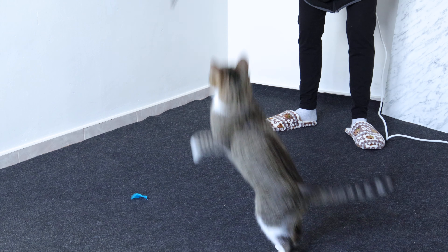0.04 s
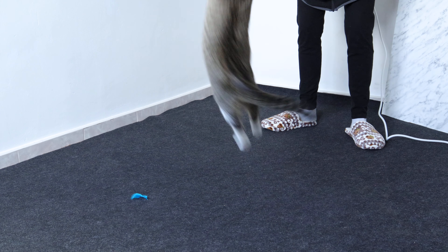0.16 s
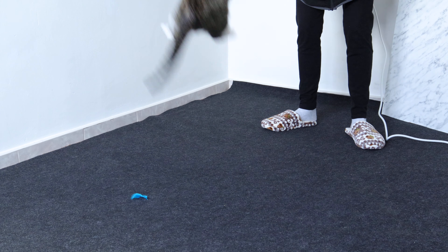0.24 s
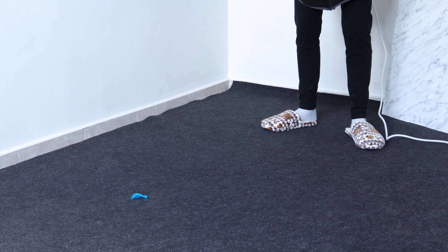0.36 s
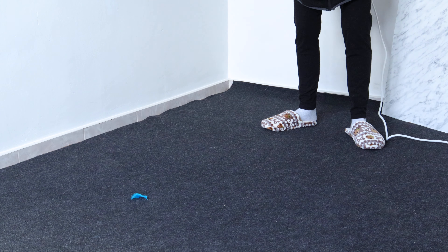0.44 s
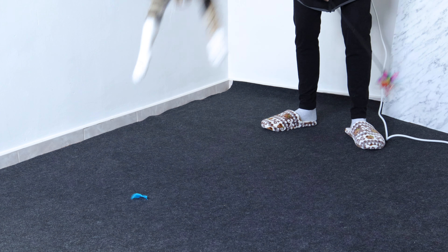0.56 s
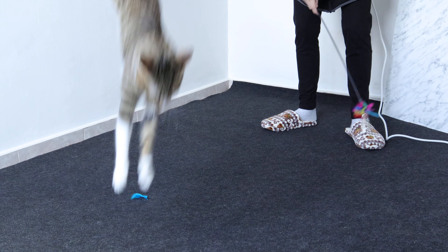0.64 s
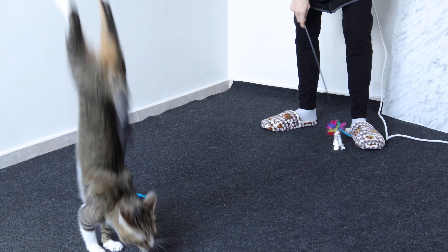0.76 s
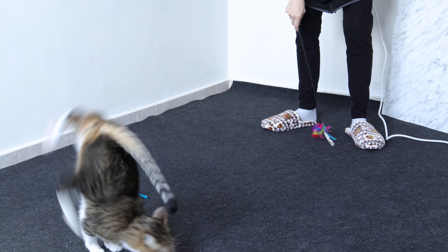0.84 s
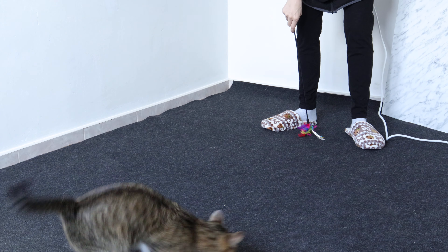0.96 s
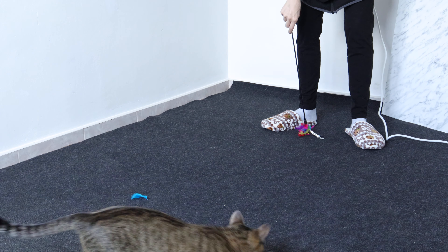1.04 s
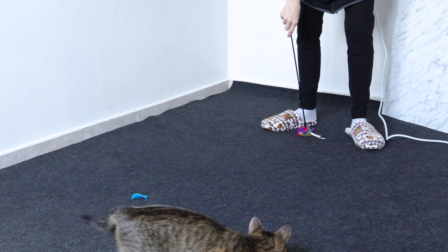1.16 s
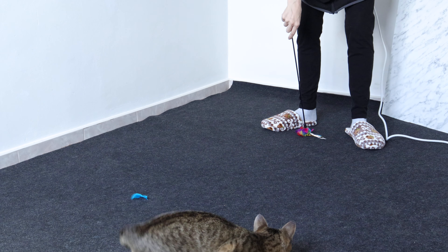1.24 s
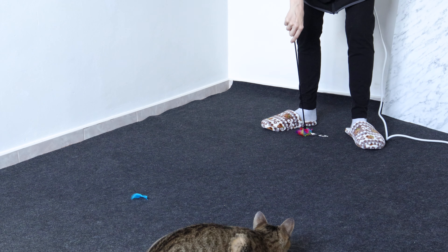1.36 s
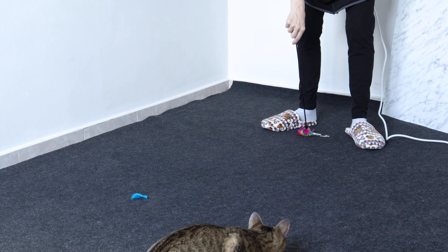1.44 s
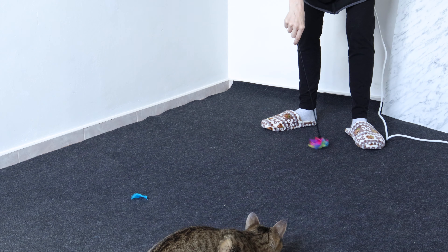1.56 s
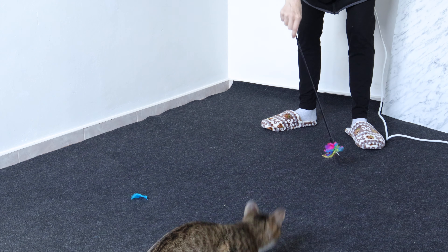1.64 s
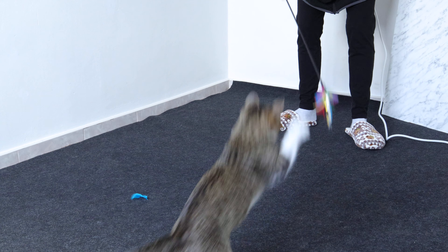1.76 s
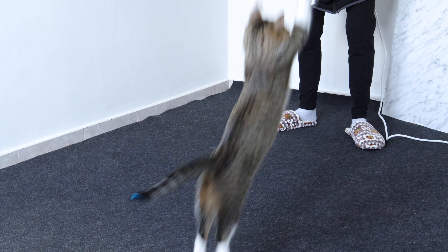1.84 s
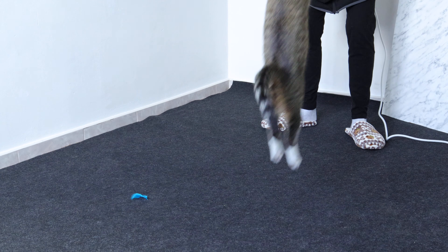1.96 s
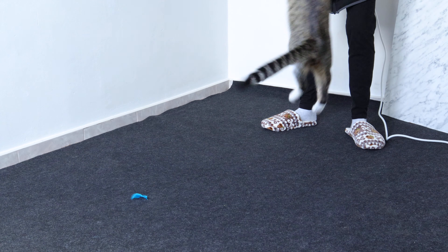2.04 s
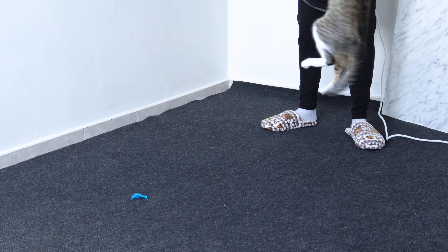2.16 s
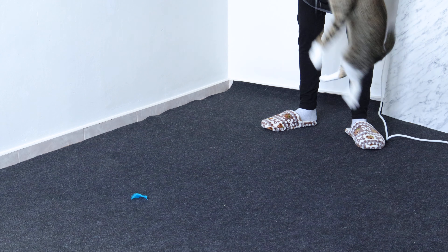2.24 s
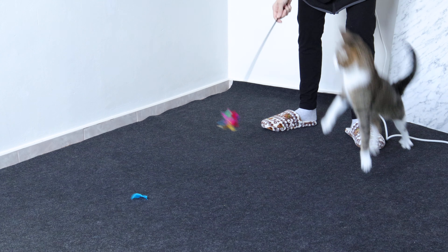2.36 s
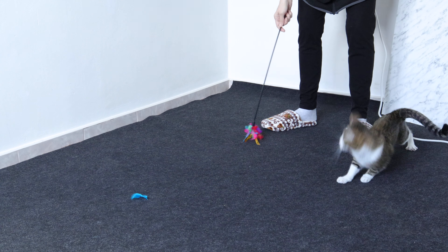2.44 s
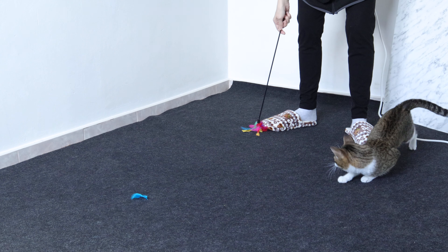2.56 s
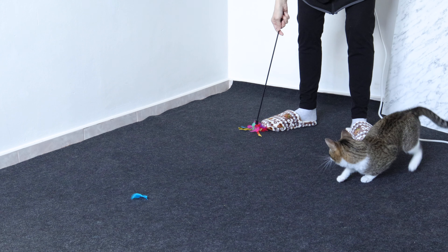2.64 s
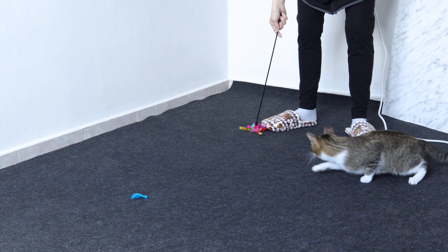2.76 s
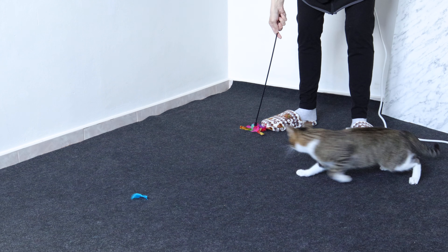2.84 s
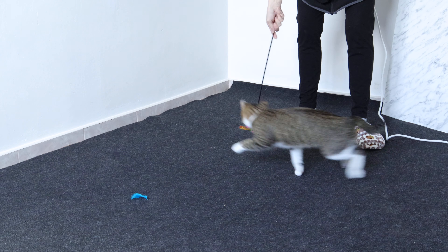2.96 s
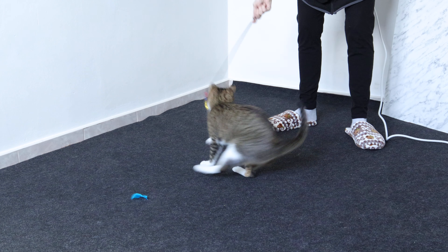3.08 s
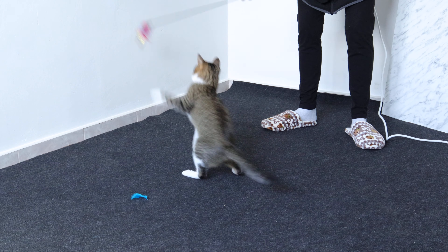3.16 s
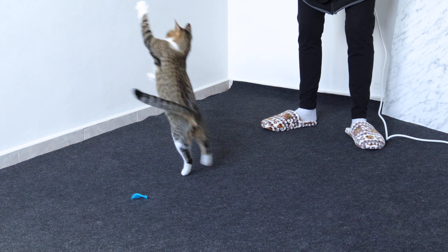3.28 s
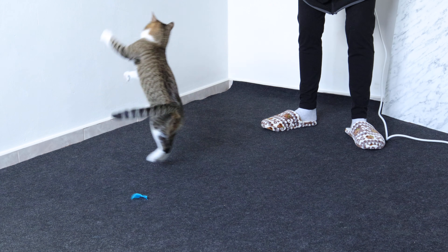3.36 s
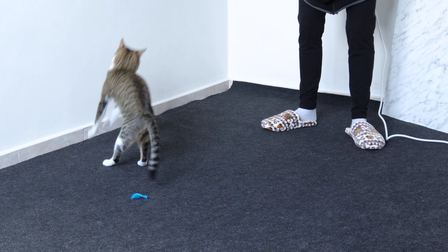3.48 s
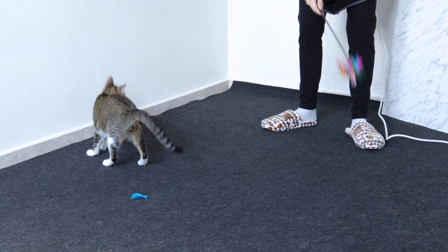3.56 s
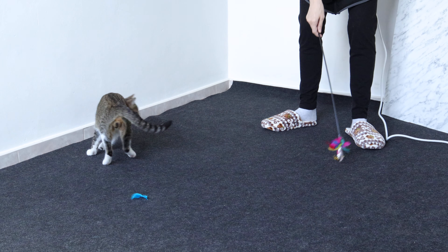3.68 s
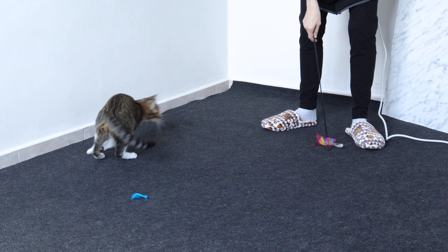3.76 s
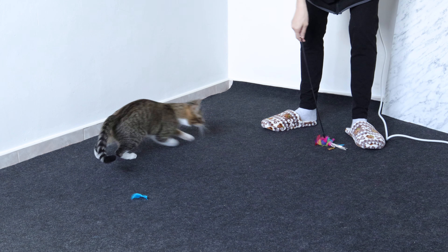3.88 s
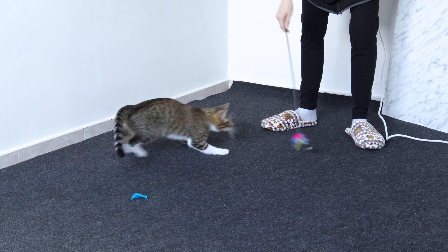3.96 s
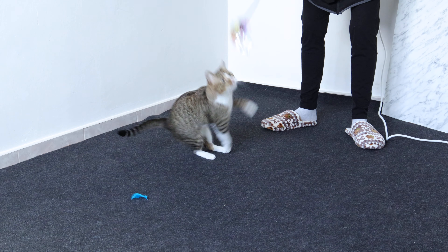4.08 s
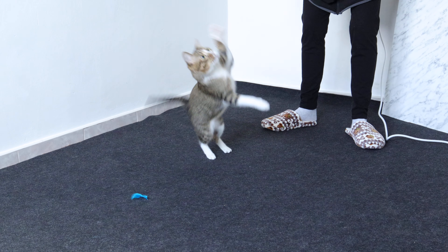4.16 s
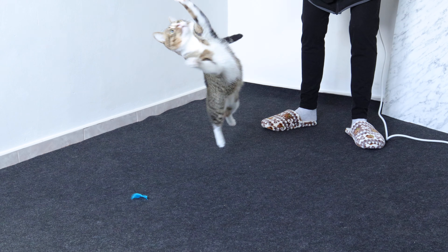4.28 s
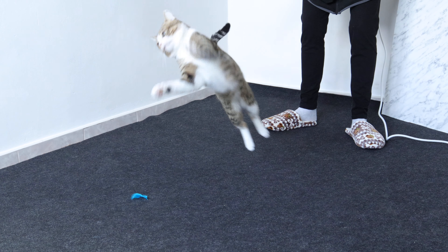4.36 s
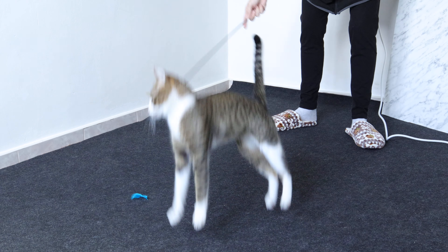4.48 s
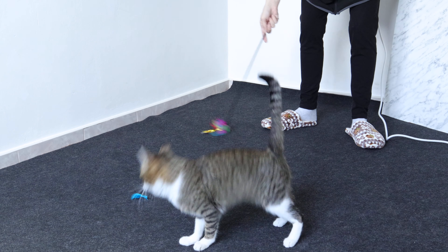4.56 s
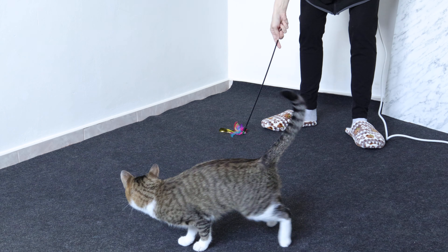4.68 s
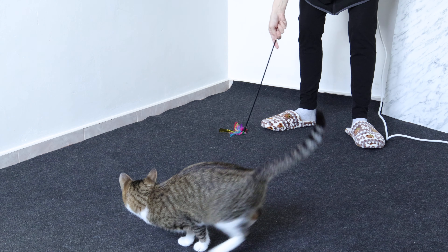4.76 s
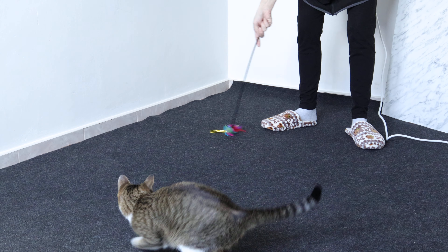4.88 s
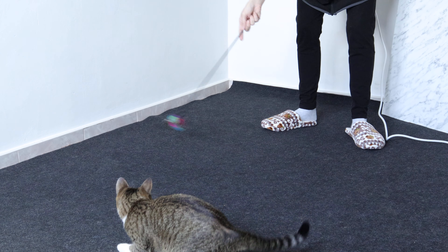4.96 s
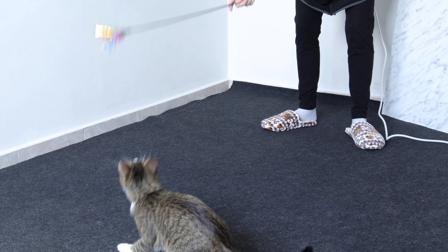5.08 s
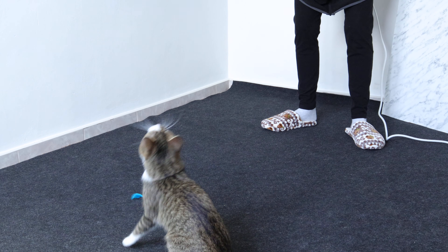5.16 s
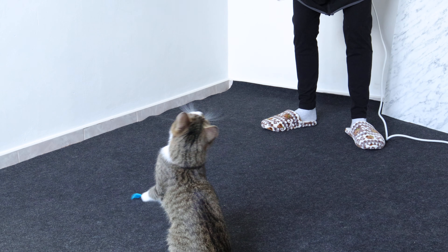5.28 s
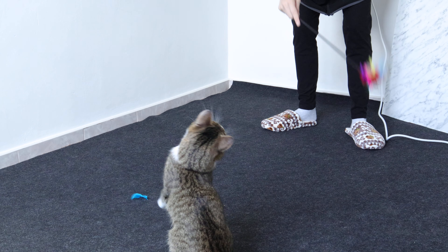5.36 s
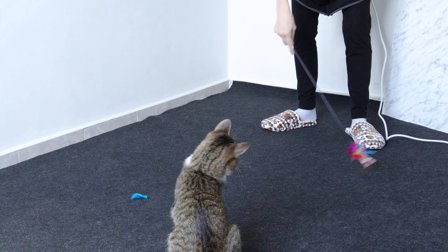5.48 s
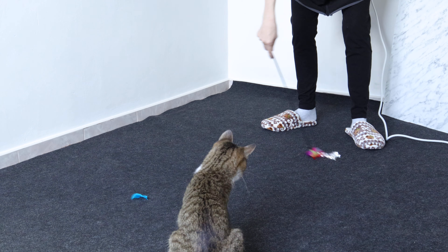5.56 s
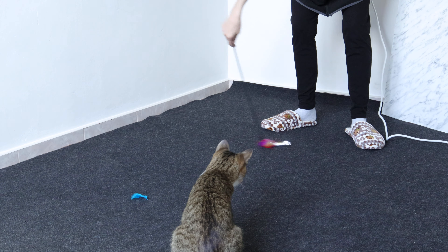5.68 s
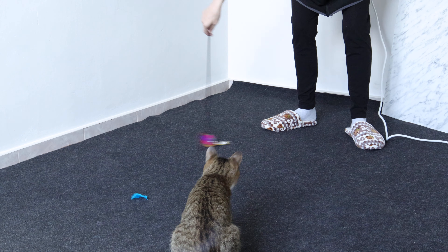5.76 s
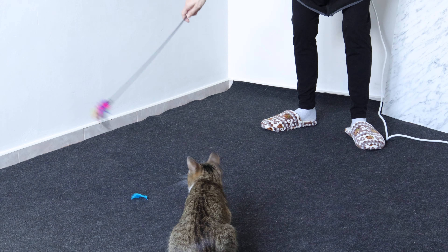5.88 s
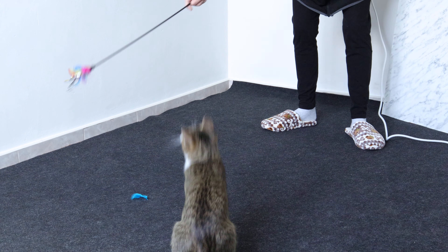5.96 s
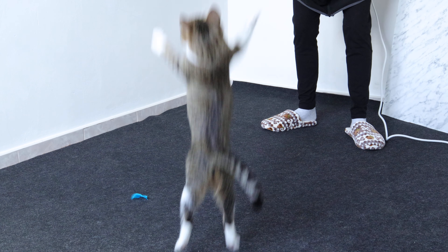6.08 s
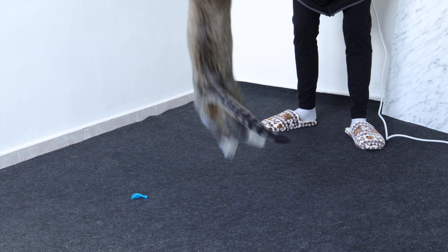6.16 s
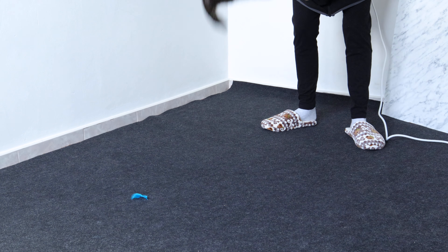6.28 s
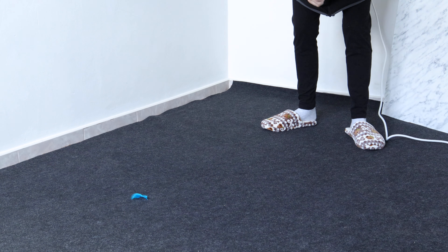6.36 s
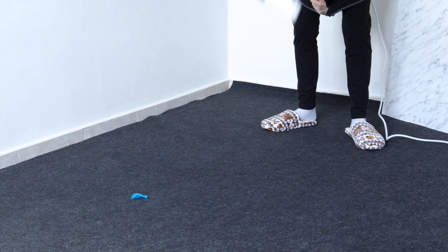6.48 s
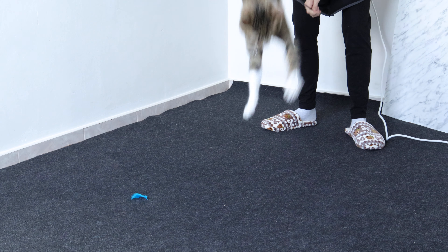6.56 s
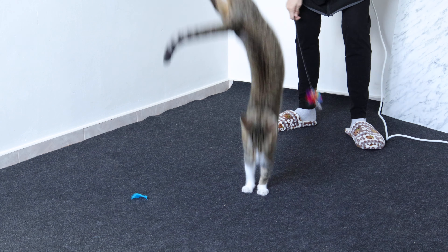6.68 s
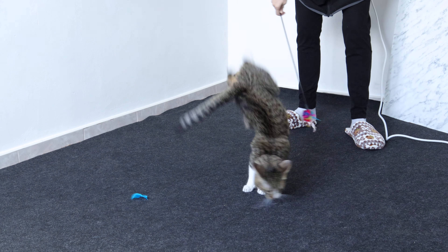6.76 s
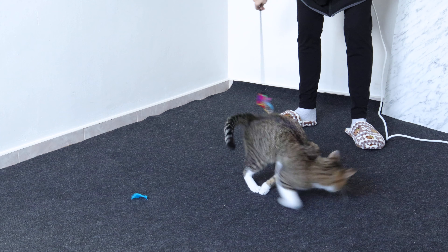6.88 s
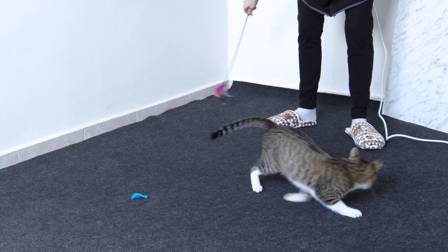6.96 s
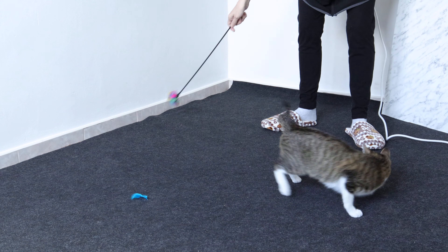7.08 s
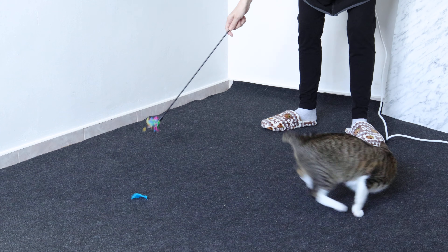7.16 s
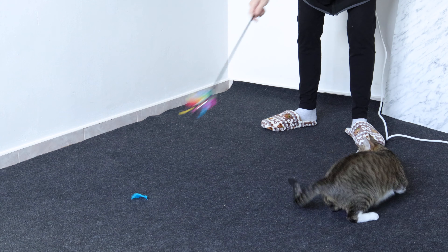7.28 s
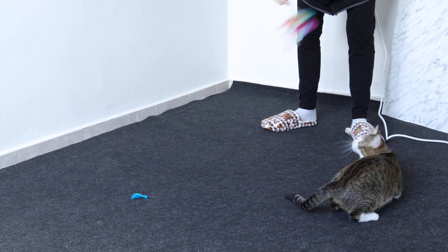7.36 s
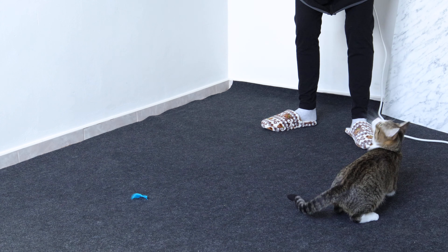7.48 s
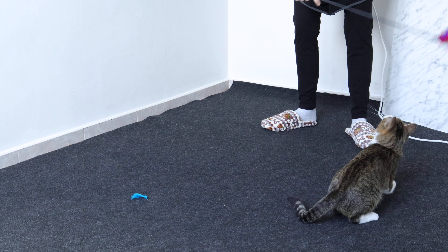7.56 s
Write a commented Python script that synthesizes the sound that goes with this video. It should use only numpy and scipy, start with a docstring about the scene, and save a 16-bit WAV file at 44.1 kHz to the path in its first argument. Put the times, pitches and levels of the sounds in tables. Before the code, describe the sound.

Bright foil rustles and crackles punctuate a cat's muffled landing thuds and brief carpet scrapes in a small, quiet, booming room.

```python
"""A small bare room with a carpeted floor, where a cat leaps after a wand toy.
Paws thump the floor: damped swings and dull slaps, with decaying sine modes for the booming room.
Pads and claws scuff the carpet and swipe at the toy: dense grains in a hump of the spectrum.
Foil tassels crinkle at every flick and snap when taut: showers of bright clicks.
Faint steady rumble and hiss, made of coloured noise, lie beneath."""
import sys
import numpy as np
from scipy import signal
from scipy.fft import rfft, irfft, next_fast_len
from scipy.io import wavfile

SR = 44100
rng = np.random.default_rng(int(sys.argv[2]) if len(sys.argv) > 2 else 0)


def digitize_waveform(pressure):
    """Quantize a signal to 16-bit integers and store it at the path in sys.argv[1].

    Rows of a 2-D input are taken as channels; values are limited to [-1, 1].
    """
    field = np.atleast_2d(pressure).T
    bounded = np.clip(field, -1, 1)
    quanta = np.round(bounded * 32767).astype(np.int16)
    wavfile.write(sys.argv[1], SR, quanta)


N = 336042  # samples in the scene
TIME = np.arange(int(SR * .9)) / SR  # time axis of one event [s]

# Levels in the tables are source levels, ahead of the room and the microphones.
# one thump or part of a thump: landing, take-off or low bump: (time [s], knock level [dB],
# knock pitch at that spot [Hz], time to full knock [s], ringing level [dB],
# body weight level [dB], pad slap level [dB], carpet scuff level [dB])
PAW_THUMPS = [(0.035, -58, 200, 0.0096, -51, -40, -62, -56), (0.114, -63, 130, 0.015, -55, -41.5, -65, -47),
              (0.861, -12, 317, 0.0105, -24.5, -37, -18, -38.5),
              (0.871, -8.5, 413, 0.0075, -21.5, -27.5, -17.5, -40),
              (0.911, -19, 262, 0.0075, -26, -29, -28.5, -40),
              (0.971, -30.5, 326, 0.0063, -48, -29, -48, -39.5),
              (1.058, -44, 398, 0.0093, -43.5, -56, -41, -40),
              (1.095, -40, 345, 0.0098, -46, -58, -56, -53),
              (1.172, -52, 368, 0.0122, -47, -50, -48, -40.5),
              (1.777, -36.5, 472, 0.011, -52, -54, -45, -46),
              (1.806, -46.5, 498, 0.014, -43, -62, -65, -60),
              (2.514, -10, 436, 0.0089, -21, -21, -20, -15.5),
              (2.531, -12, 362, 0.011, -19.5, -30, -16.5, -31),
              (2.549, -13.5, 340, 0.0093, -15.5, -35, -17.5, -24),
              (2.608, -24, 442, 0.014, -34, -40, -30, -53), (2.816, -47, 382, 0.015, -39, -43, -40, -38),
              (2.94, -51, 390, 0.01, -47, -46, -42, -38), (2.98, -43.5, 418, 0.014, -43, -60, -43, -53),
              (3.171, -34.5, 387, 0.015, -34, -35, -51, -35.5),
              (3.191, -34.5, 370, 0.014, -33, -46, -38.5, -41),
              (3.243, -21.5, 373.5, 0.012, -29.5, -21.5, -29, -35),
              (3.345, -45, 223, 0.0094, -48, -38, -55, -36), (3.55, -52, 228, 0.016, -49, -52, -46, -60),
              (3.595, -55, 230, 0.015, -47, -46, -53, -60), (3.649, -32, 171, 0.02, -32.5, -32, -34.5, -46),
              (3.657, -30.5, 358, 0.011, -33, -48, -44.5, -44.5),
              (3.685, -33.5, 196, 0.015, -51, -45, -53, -51), (3.722, -34.5, 197, 0.02, -52, -48, -61, -65),
              (4.025, -47, 226, 0.015, -48, -46, -56, -58), (4.086, -40, 366, 0.011, -49, -39, -46, -35.5),
              (4.15, -48, 200, 0.0156, -51, -39, -49, -48), (4.2, -32, 390, 0.012, -40, -32.5, -41, -35.5),
              (4.234, -34, 424, 0.01365, -41, -58, -52, -50), (4.438, -41, 61, 0.014, -62, -55, -55, -73),
              (4.505, -44, 58.7, 0.063, -42, -43, -69, -78),
              (4.657, -22.5, 296, 0.012, -28.5, -39, -27, -42),
              (4.664, -19, 456, 0.0083, -32.5, -56, -27, -35), (4.7, -30, 286, 0.014, -30, -36, -49, -52),
              (6.818, -27, 336, 0.011, -29, -25, -21.5, -28), (6.839, -20, 414, 0.0064, -29, -41, -37, -31),
              (6.872, -36, 229, 0.014, -43, -42, -40, -41), (6.925, -43, 226, 0.014, -42, -46, -52, -41),
              (7.014, -34.5, 258, 0.012, -35.5, -35, -38.5, -30),
              (7.09, -43, 262.4, 0.012, -50, -48, -48, -49),
              (7.238, -45.5, 373, 0.0132, -48, -54, -47, -43.5),
              (7.354, -44.5, 393, 0.013, -52, -53, -53, -43)]
# further scuffs, claw clicks, pats and swipes, some right at a landing: (time [s], level [dB],
# time to full speed [s], centre frequency [Hz], focus [exponent: higher is narrower and hollower])
SCUFFS = [(0.855, -19, 0.0073, 1390, 13), (0.875, -40.5, 0.012, 3000, 8.9), (1.058, -44, 0.0075, 1700, 2.8),
          (1.169, -52, 0.014, 1830, 5.8), (1.309, -45.5, 0.0045, 2490, 2.7),
          (1.68, -38.5, 0.0099, 1960, 5.3), (1.771, -25, 0.001, 1300, 1.6),
          (1.777, -37.5, 0.009, 2130, 8.2), (1.953, -33.5, 0.015, 1470, 1.6), (1.966, -39, 0.009, 2620, 56),
          (2.512, -14, 0.0048, 3220, 1.7), (2.548, -9.5, 0.0041, 665, 9.2), (2.548, -14, 0.0056, 1380, 5.4),
          (2.82, -36, 0.015, 940, 4.4), (2.938, -26.5, 0.0088, 900, 28), (2.938, -33, 0.019, 1750, 2.3),
          (3.004, -29.5, 0.0077, 860, 25.6), (3.169, -25.5, 0.0068, 2000, 0.49),
          (3.244, -26, 0.0067, 1560, 1.7), (3.829, -30, 0.005, 1600, 0.26), (3.864, -40, 0.015, 1400, 0.89),
          (4.027, -35, 0.025, 1177, 0.45), (4.076, -26, 0.013, 1700, 2.6), (4.198, -35.5, 0.0061, 1340, 15),
          (4.644, -24, 0.0057, 433, 27), (4.648, -32.5, 0.011, 1410, 10), (5.007, -37, 0.016, 2050, 7),
          (5.902, -43.5, 0.013, 2060, 7.7), (6.227, -25, 0.0067, 2110, 1.1),
          (6.282, -38.5, 0.029, 2270, 1.5), (6.37, -43, 0.02, 2200, 1.5), (6.44, -38, 0.024, 2550, 3.1),
          (6.565, -50, 0.0098, 2100, 4.4), (6.808, -27.5, 0.007, 1190, 2.2),
          (6.812, -33.5, 0.013, 1000, 110), (6.822, -26.5, 0.0097, 523, 8), (6.812, -27, 0.0041, 3400, 2),
          (7.011, -30.5, 0.011, 1450, 3.6), (7.172, -38.5, 0.0053, 1250, 5.8),
          (7.196, -37.5, 0.0057, 1050, 30), (7.358, -46, 0.01, 1680, 4.5)]
# shakes of the foil tassels, from quick flicks to long gentle dangling:
# (time [s], level [dB], length before release [s])
TASSEL_SHAKES = [(0.0, -38.5, 0.039), (0.285, -51.5, 0.022), (0.88, -49.5, 0.13), (1.309, -53.5, 0.21),
                 (1.591, -47.5, 0.091), (1.683, -45, 0.052), (1.787, -44, 0.012), (1.858, -48, 0.014),
                 (1.95, -41, 0.021), (2.228, -60, 0.093), (2.509, -28, 0.041), (2.664, -47, 0.048),
                 (2.748, -39, 0.037), (2.944, -40, 0.026), (3.107, -39.5, 0.15), (3.553, -43, 0.04),
                 (3.826, -42.5, 0.085), (4.024, -41.5, 0.091), (4.133, -40.5, 0.074), (4.289, -44.5, 0.12),
                 (4.682, -39.5, 0.051), (4.967, -45, 0.038), (5.006, -31, 0.037), (5.18, -48, 0.02),
                 (5.658, -40, 0.021), (5.688, -37, 0.018), (5.744, -50.5, 0.6), (6.046, -42, 0.036),
                 (6.227, -25.5, 0.023), (6.281, -27.5, 0.044), (6.366, -31, 0.056), (6.439, -30.5, 0.052),
                 (6.564, -33, 0.014), (6.709, -49, 0.015), (6.807, -42, 0.013), (6.925, -28.5, 0.02),
                 (6.986, -32, 0.033), (7.158, -43, 0.011), (7.354, -54.5, 0.18)]
# a strip of foil pulled taut: (time [s], level [dB], time to full tension [s])
FOIL_SNAPS = [(0.384, -40, 0.0037), (1.306, -44.5, 0.0036), (1.969, -20.5, 0.001), (2.243, -42.5, 0.0025),
              (2.298, -42, 0.0025), (4.979, -40.5, 0.002), (5.387, -42.5, 0.0067), (5.948, -32.5, 0.0033),
              (6.229, -17, 0.0011), (6.235, -25, 0.0016), (6.312, -22, 0.0011), (6.365, -20, 0.0011),
              (6.406, -26, 0.0012)]
# deep modes of the room, driven by weight: (frequency [Hz], level [dB], t60 [s])
DEEP_MODES = [(54.2, -13, 0.89), (96.9, -11, 0.58), (112.3, -12, 0.56), (148, -7.5, 0.25)]
# higher modes of floor and room, driven by the knock: (frequency [Hz], level [dB], t60 [s])
KNOCK_MODES = [(169, -30, 0.19), (210.8, -2.5, 0.64), (281.5, -11.5, 0.49), (374, -13, 0.36),
               (425.8, -3.5, 0.26), (497, -4.5, 0.22), (626, -15, 0.12), (685, -21, 0.51)]
# spectral shape of a pad's dull slap: (frequency [Hz], density [dB per Hz])
SLAP_COLOUR = [(40, -20), (100, -34), (160, -15), (260, 2.5), (400, 5), (520, -7), (660, -10),
               (1000, -19.5), (3000, -82)]
# spectral shape of the foil: (frequency [Hz], density [dB per Hz])
FOIL_COLOUR = [(100, -10), (300, -10.5), (1000, -8), (2400, -2), (5000, -5), (7500, -3), (10700, 2),
               (12000, -5), (15000, -2), (16000, -4.5)]
# a taut strip is brighter than a loose one: (frequency [Hz], gain [dB])
TAUT_TINT = [(1000, -14), (6000, -1), (10000, 1)]
# spectral shape of the background: (frequency [Hz], density [dB per Hz])
BACKGROUND_COLOUR = [(15, -38), (25, -7.5), (52, 0.5), (86, -4.5), (119, -2.5), (260, -7), (289, -8.5),
                     (359, -10), (389, -10), (582, -11.5), (762, -12), (1110, -15.5), (1570, -15.5),
                     (6210, -28.5), (15500, -45)]
# stereo width of the background: (frequency [Hz], side against mid [dB])
BACKGROUND_WIDTH = [(60, -16), (110, -8.5), (200, -1), (380, 4), (700, 4), (1290, 5), (2380, 4.5),
                    (4400, 6), (8120, 4.5), (15000, 13)]
# stereo width of the room's sound: (frequency [Hz], side against mid [dB])
ROOM_WIDTH = [(60, -7), (300, -24), (700, -16), (1300, -17.5), (2400, -7.5), (4400, -3.5), (8000, 2.5),
              (15000, 6)]
# reverberation time: (frequency [Hz], t60 [s])
REVERBERATION = [(100, 0.52), (400, 0.42), (1200, 0.33), (4000, 0.41), (10000, 0.28), (15000, 0.19)]
# response of both microphones: (frequency [Hz], gain [dB])
MICROPHONE_RESPONSE = [(20, -4), (45, -1), (12000, -2.5), (13500, -14), (16000, -29)]
# left microphone against right: (frequency [Hz], gain [dB])
LEFT_LEAN = [(30, -1), (130, 0.4), (300, 1.13), (1000, -0.5), (2000, -0.65), (12000, 0)]

BACKGROUND_DB = -50.5  # rms of the mid channel, ahead of the microphones
FLICK_ATTACK_S, FLICK_RELEASE_S, FLICK_GROWTH_DB_PER_S = 0.0018, 0.018, 0.5
BRISK_DB, QUICKENING = -38, 0.13  # the attack is longer below BRISK_DB, shorter above [dB per dB]
FLUTTER_DB, FLUTTER_PER_S = 2.5, 91  # the strips bunch and part at random
SETTLE_DB, SETTLE_S, LOOSEN_S = -21.5, 0.12, 0.11  # ticks of loose strips; LOOSEN_S scales shake energy
SCUFF_LEAD_S, SCUFF_RISE_S = 0.006, 0.01  # a paw skids just before it takes weight
SCUFF_HZ, SCUFF_FOCUS = 745, 1.2
CATCH_DB, CATCHES_PER_S = 4.5, 150  # a sliding paw grips and slips unevenly
UPPER_RATIO, UPPER_DB = 1.5, -10.5  # the floor's second, higher swing, ahead of the pad's colour
KNOCK_DAMPING = 4.1  # exponent: the soft pad stays on the floor and stills its swings
EDGE_HZ = 15800  # band limit


def amp(db):
    """Decibel law: amplitude gain is ten to the power of level over twenty."""
    return 10 ** (np.asarray(db) / 20)


def unit(x):
    """Normalisation: scales to an rms of 1."""
    return x / np.sqrt(np.mean(x ** 2) + 1e-20)


def read(points, hz):
    """Interpolation: reads a table along a log-frequency axis."""
    f, value = np.transpose(points)
    return np.interp(np.log(hz + 1), np.log(f + 1), value)


def freqs(x):
    """Fourier analysis: the frequencies in the spectrum of x [Hz]."""
    return np.fft.rfftfreq(len(x), 1 / SR)


def colour(x, points):
    """Linear filtering: weights each frequency by a table of gain in dB."""
    return irfft(rfft(x) * amp(read(points, freqs(x))), len(x))


def add(mix, s, sound):
    """Superposition: sums a sound into the mix from time s."""
    part = mix[max(round(s * SR), 0):][:len(sound)]
    part += sound[:len(part)]


def swell(rise):
    """Impulse envelope: a push starts at once, peaks at 1 after the rise time, then relaxes."""
    u = TIME / max(rise, 1 / SR)
    return (u * np.exp(1 - u)) ** 0.84


def grains(per_s, spread_db):
    """Random impulse process: tiny clicks of either sign, a few much larger than the rest."""
    chance, size, sign = rng.random((3, len(TIME)))
    size = np.minimum(-np.log(1 - size), 4)
    happens = chance < per_s / SR
    return happens * np.sign(sign - .5) * amp(spread_db * size)


def waver(per_s):
    """Random modulation: a wander through per_s random values a second, setting out from zero."""
    knots = rng.standard_normal(200)
    wander = np.interp(TIME * per_s, np.arange(len(knots)), knots)
    return wander * np.minimum(TIME * per_s / 2, 1)


def tail():
    """Reverberant decay: dense wall reflections of energy 1, each band dying at its own speed."""
    taps = rng.standard_normal(len(TIME)) * (1 - np.exp(-(TIME / 0.0017) ** 2))
    hz, t, z = signal.stft(taps, SR, nperseg=256)
    t60 = read(REVERBERATION, hz)[:, None]
    decayed = z * amp(-60 * t / t60) / np.sqrt(t60)
    echo = signal.istft(decayed, SR, nperseg=256)[1]
    return echo / np.linalg.norm(echo)


def reflect(x):
    """Dense reverberation: the sound takes turns among four random tails, for an even colour."""
    # the four shares overlap and go round 45 times a second
    turn = 2 * np.pi * np.arange(N) / SR * 45
    shares = [np.maximum(np.cos(turn + k * np.pi / 2), 0) for k in range(4)]
    return sum(signal.oaconvolve(x * share, tail())[:N] for share in shares)


def room(x, direct_db, wet_db):
    """Direct and reverberant fields at two close microphones, widest in the treble."""
    size = next_fast_len(N + len(TIME), True)
    direct = amp(direct_db) * rfft(x, size)
    width = amp(read(ROOM_WIDTH, np.fft.rfftfreq(size, 1 / SR)))
    mid = direct + amp(wet_db) * rfft(reflect(x), size)
    # a quarter-cycle shift spreads the direct sound
    side = width * (1j * direct + amp(wet_db) * rfft(reflect(x), size))
    left_right = np.array([mid + side, mid - side]) / np.sqrt(1 + width ** 2)
    return irfft(left_right, size)[:, :N]


def background():
    """Stationary noise: steady low room rumble and microphone hiss."""
    mid, side = (unit(colour(noise, BACKGROUND_COLOUR)) for noise in rng.standard_normal((2, N)))
    side = colour(side, BACKGROUND_WIDTH)
    return amp(BACKGROUND_DB) * np.array([mid + side, mid - side])


def shaking(db, length):
    """Driven motion: attack, a fluttering and very slowly growing hold, then exponential release."""
    # a gentler shake takes longer to get going
    attack_s = FLICK_ATTACK_S * amp(QUICKENING * (BRISK_DB - db))
    attack = np.minimum(TIME / attack_s, 1)
    hold = amp(FLUTTER_DB * waver(FLUTTER_PER_S) + FLICK_GROWTH_DB_PER_S * TIME)
    release = np.exp(-np.maximum(TIME - length, 0) / FLICK_RELEASE_S)
    return attack * hold * release


def crinkle(motion):
    """Multiple impacts: foil strips slap in a shower of bright clicks, then tick as they settle."""
    clicks = grains(per_s=10000, spread_db=3.5)
    shake = unit(colour(clicks, FOIL_COLOUR)) * motion
    # a longer shake leaves more strips loose
    stirred = signal.fftconvolve(motion ** 2, swell(SETTLE_S) ** 2)[:len(TIME)]
    loose = np.sqrt(abs(stirred) / (LOOSEN_S * SR))
    ticks = grains(per_s=600, spread_db=3.3)
    settle = unit(colour(ticks, FOIL_COLOUR)) * loose
    return shake + amp(SETTLE_DB) * settle


def tassels():
    """Impact radiation from thin sheets: the toy's foil shakes and snaps as the wand moves."""
    out = np.zeros(N)
    for s, db, length in TASSEL_SHAKES:
        add(out, s, amp(db) * crinkle(shaking(db, length)))
    for s, db, rise in FOIL_SNAPS:
        add(out, s, amp(db) * colour(crinkle(swell(rise)), TAUT_TINT))
    return room(out, direct_db=-1.0, wet_db=-2.0)


def scuff(db, rise, hz, focus):
    """Stick-slip friction: fibres catch and let go, dense grains in one hump of the spectrum."""
    u = freqs(TIME) / hz
    hump = (2 * u / (1 + u ** 2)) ** focus
    fibres = irfft(rfft(grains(per_s=9000, spread_db=2.0)) * hump, len(TIME))
    uneven = fibres * amp(CATCH_DB * waver(CATCHES_PER_S))
    return amp(db) * unit(uneven) * swell(rise)


def scuffs():
    """Sliding friction: a short skid with every thump; further scuffs, claw clicks, pats and swipes."""
    out = np.zeros(N)
    for s, *_, db in PAW_THUMPS:
        add(out, s - SCUFF_LEAD_S, scuff(db, SCUFF_RISE_S, SCUFF_HZ, SCUFF_FOCUS))
    for s, db, rise, hz, focus in SCUFFS:
        add(out, s, scuff(db, rise, hz, focus))
    return room(out, direct_db=-6.0, wet_db=-5.5)


def swing(hz, rise, damping):
    """Damped oscillation: a few swings of the floor, rms 1 at their peak."""
    return np.sqrt(2) * np.sin(2 * np.pi * hz * TIME) * swell(rise) ** damping


def ring(modes, build):
    """Modal resonance: modes build up as the first reflections arrive, then die away."""
    tones = sum(amp(db - 60 * TIME / t60) * np.sin(2 * np.pi * hz * TIME) for hz, db, t60 in modes)
    return np.sqrt(2) * tones * (1 - np.exp(-TIME / build))


def paws():
    """Impact excitation: each thump slaps and swings the floor, which leaves the room ringing."""
    knocks, slaps = np.zeros((2, N))
    for s, db, hz, rise, ring_db, weight_db, slap_db, _ in PAW_THUMPS:
        # the floor swings at two pitches; the soft pad hardly drives the upper one when it lies high
        lower = swing(hz, rise, KNOCK_DAMPING)
        upper_hz = UPPER_RATIO * hz
        upper_gain = amp(UPPER_DB + read(SLAP_COLOUR, upper_hz))
        upper = upper_gain * swing(upper_hz, rise, KNOCK_DAMPING)
        add(knocks, s, amp(db) * (lower + upper))
        # modes near the pitch of the knock take up the most energy: 6 dB less per octave away
        modes = [(f, level - 6 * abs(np.log2(f / hz)), t60) for f, level, t60 in KNOCK_MODES]
        add(knocks, s + rise, amp(ring_db) * ring(modes, build=0.0063))
        # the body's weight gives a short, deep 106 Hz swing and drives the deep modes
        weight_swing = amp(weight_db - 10.5) * swing(hz=106.3, rise=0.011, damping=1.0)
        boom = amp(weight_db - 3.5) * ring(DEEP_MODES, build=0.0041)
        add(knocks, s, weight_swing + boom)
        slap = unit(colour(rng.standard_normal(len(TIME)), SLAP_COLOUR)) * swell(0.0085)
        add(slaps, s, amp(slap_db) * slap)
    # knocks, alike in both channels, carry their own ringing; the slaps get reflections
    return knocks + room(slaps, direct_db=-0.5, wet_db=-0.5)


def scene():
    """Superposition: background, toy and cat together."""
    return background() + tassels() + scuffs() + paws()


def record(dry):
    """Transduction: the microphones' roll-off at both ends and slight imbalance, then the band limit."""
    left, right = (colour(channel, MICROPHONE_RESPONSE) for channel in dry)
    heard = np.array([colour(left, LEFT_LEAN), right])
    lowpass = signal.firwin(511, EDGE_HZ, window=("kaiser", 9), fs=SR)
    return signal.oaconvolve(heard, lowpass[None], "same")


dry = scene()
out = record(dry)
digitize_waveform(out)
```